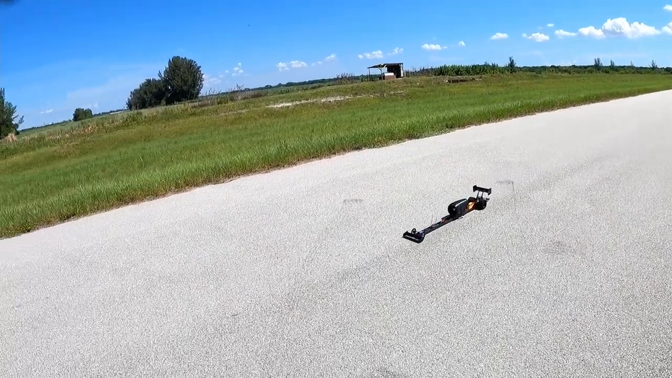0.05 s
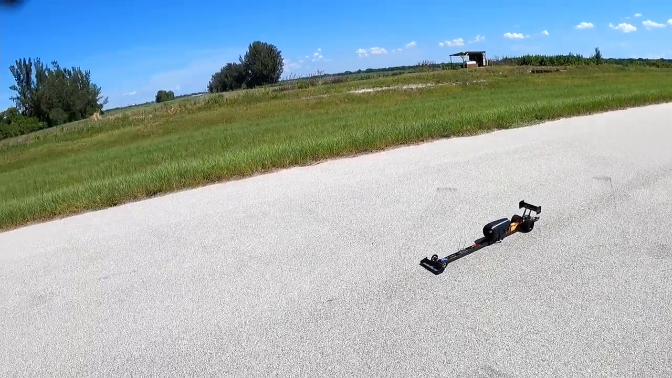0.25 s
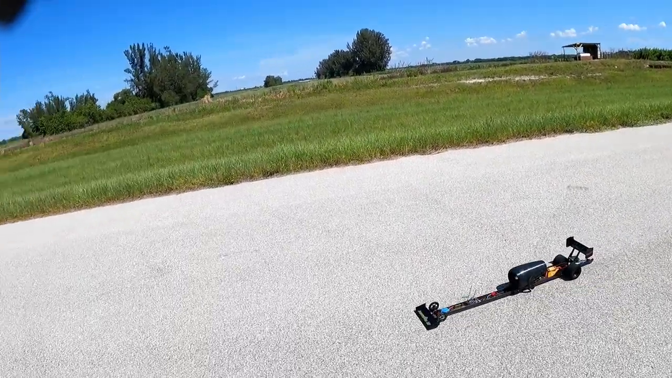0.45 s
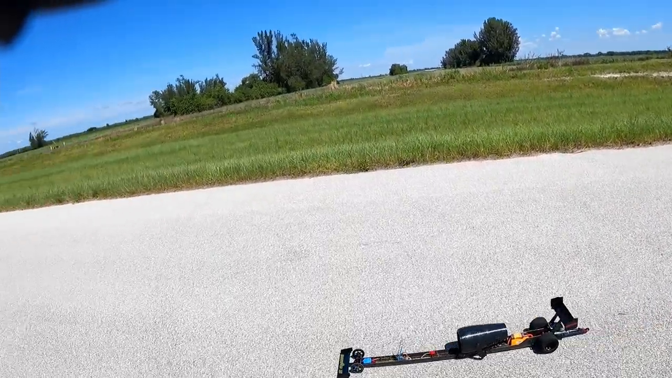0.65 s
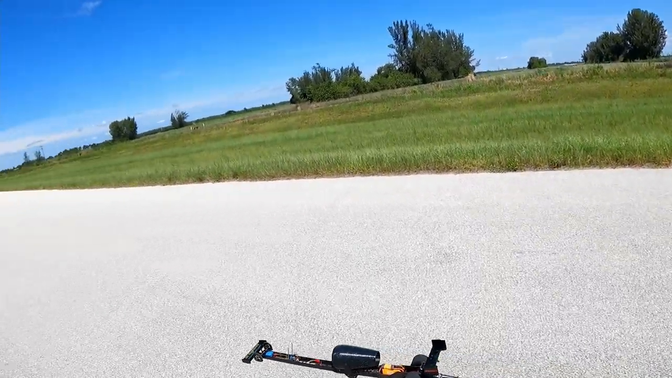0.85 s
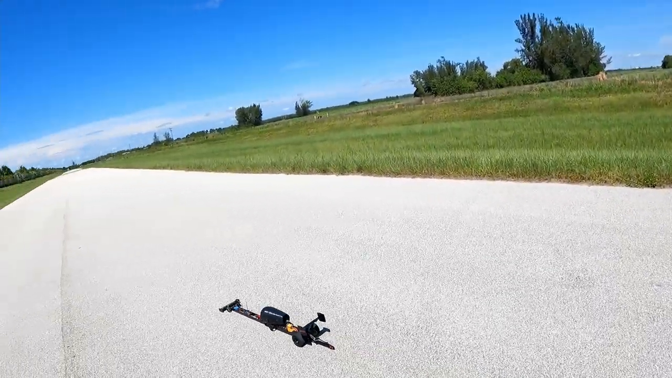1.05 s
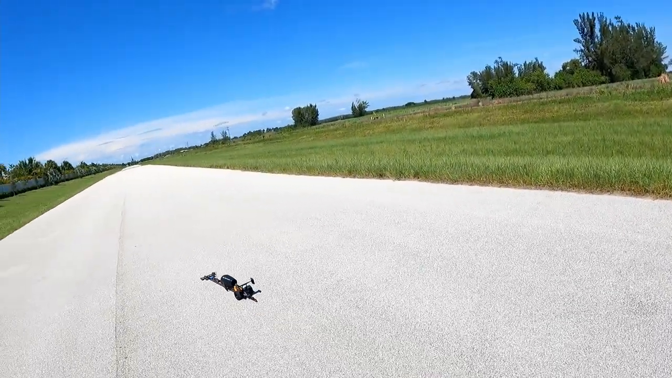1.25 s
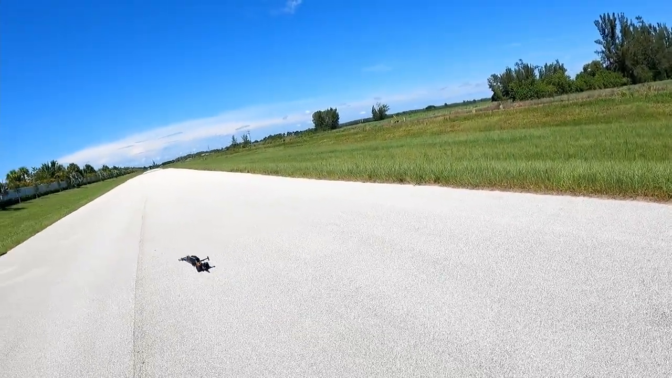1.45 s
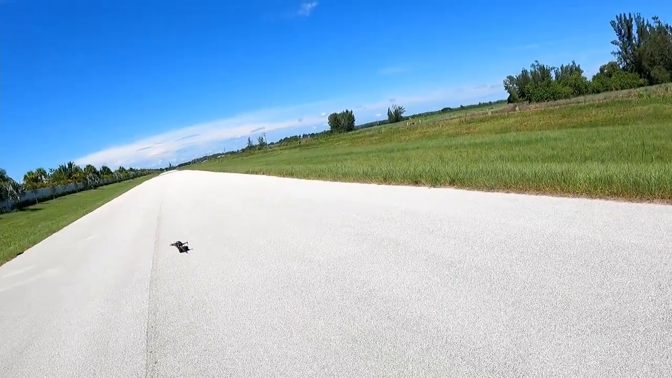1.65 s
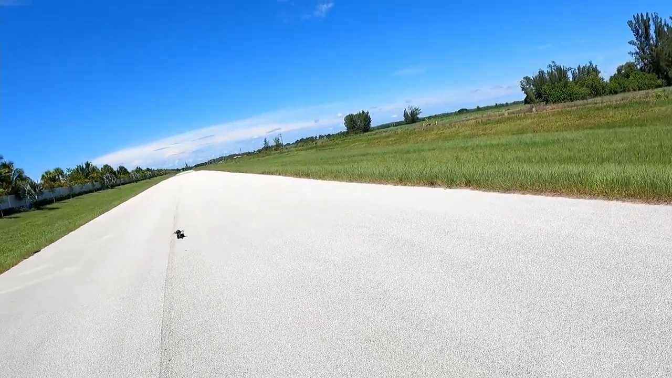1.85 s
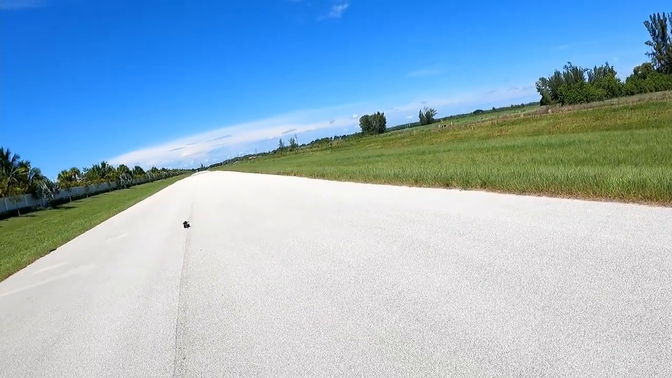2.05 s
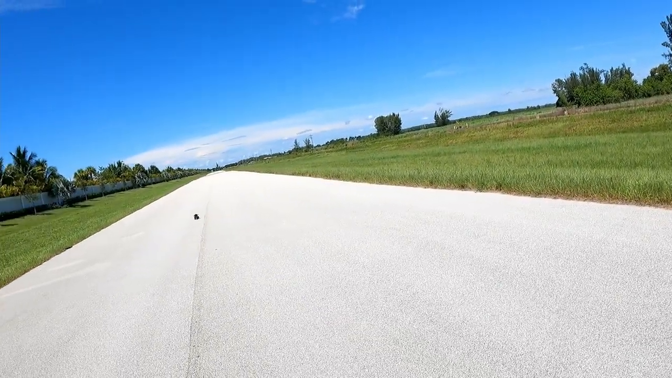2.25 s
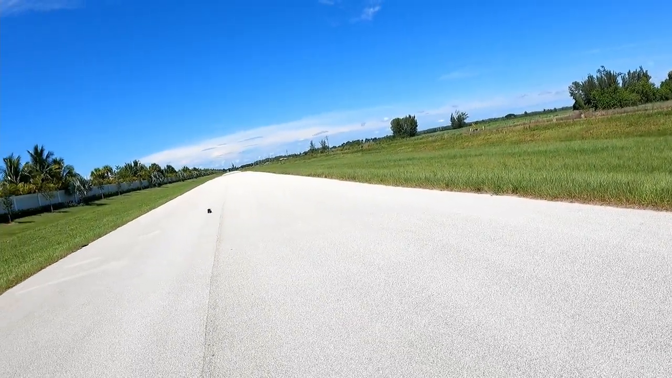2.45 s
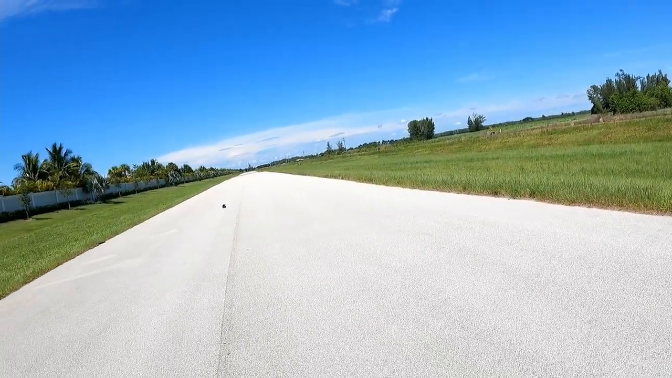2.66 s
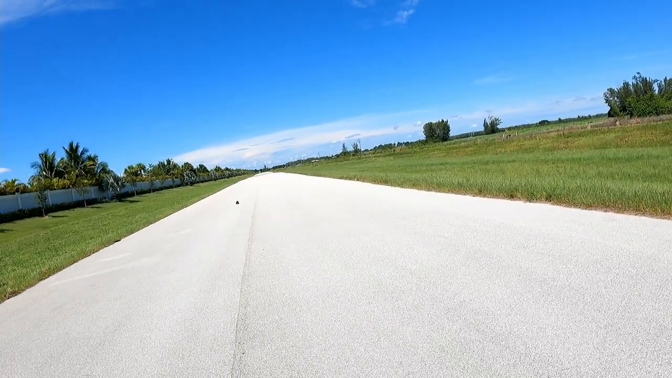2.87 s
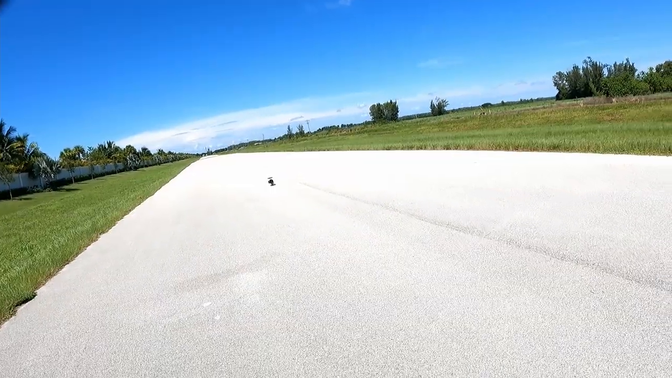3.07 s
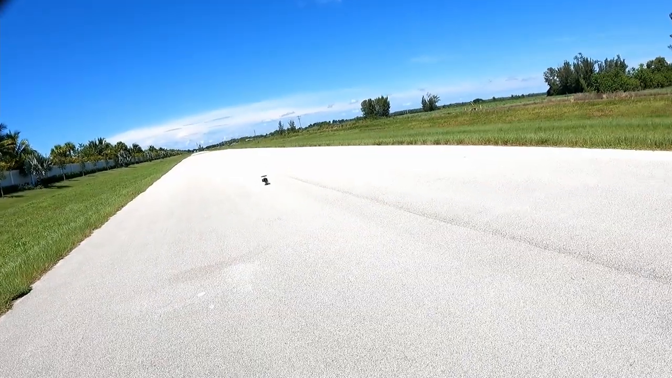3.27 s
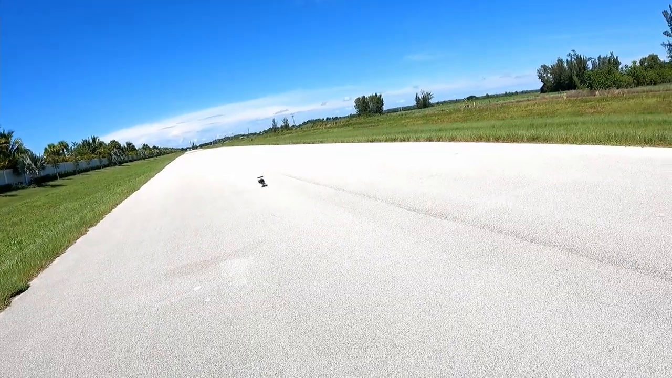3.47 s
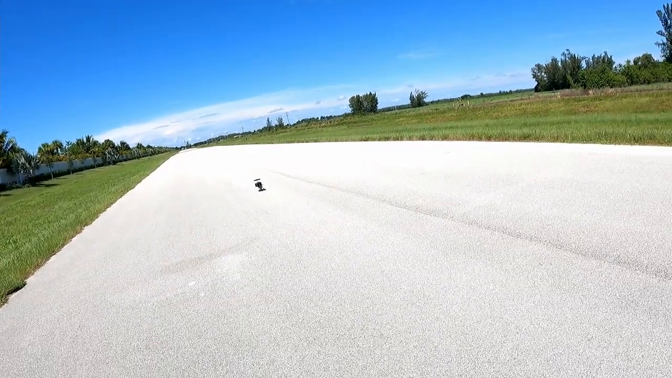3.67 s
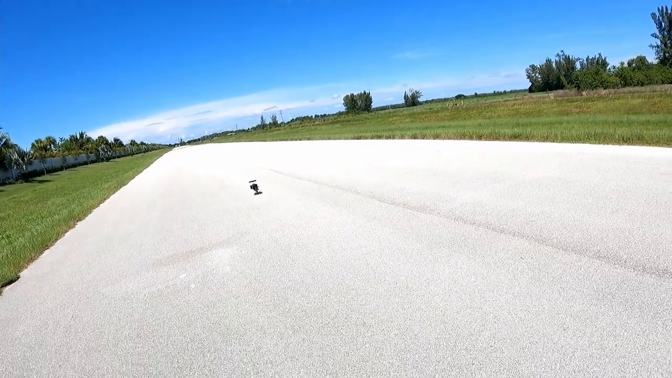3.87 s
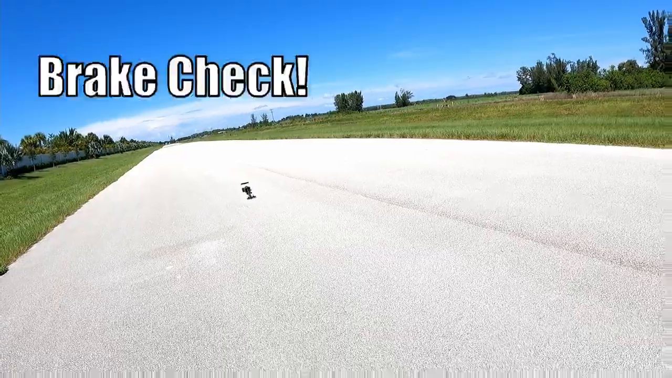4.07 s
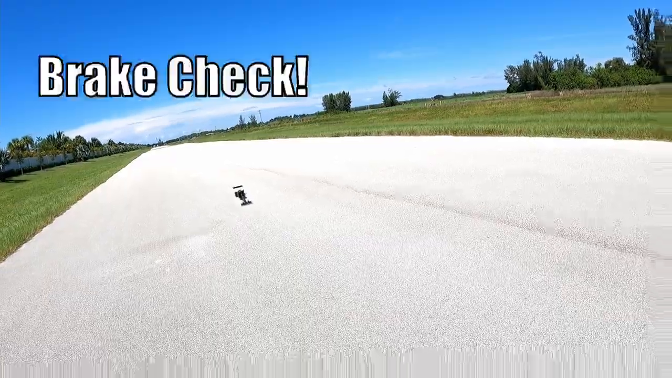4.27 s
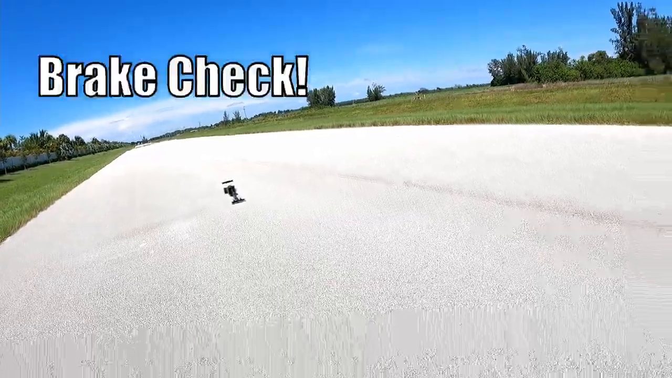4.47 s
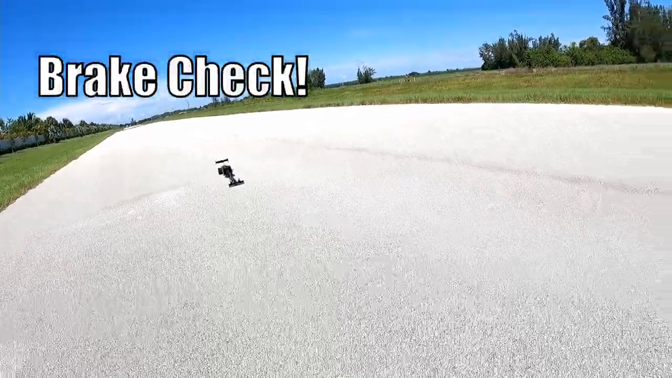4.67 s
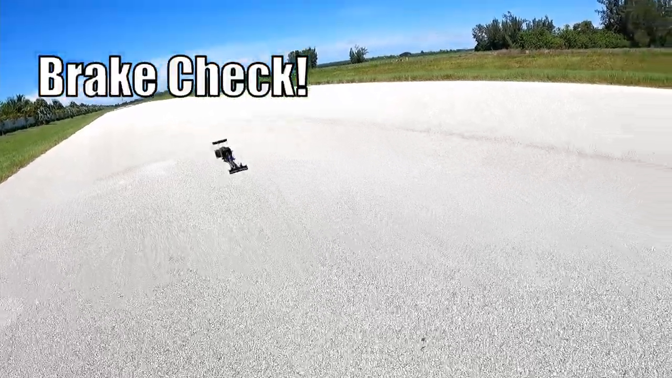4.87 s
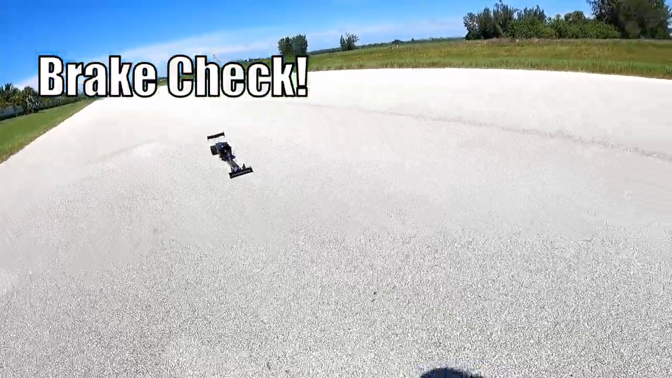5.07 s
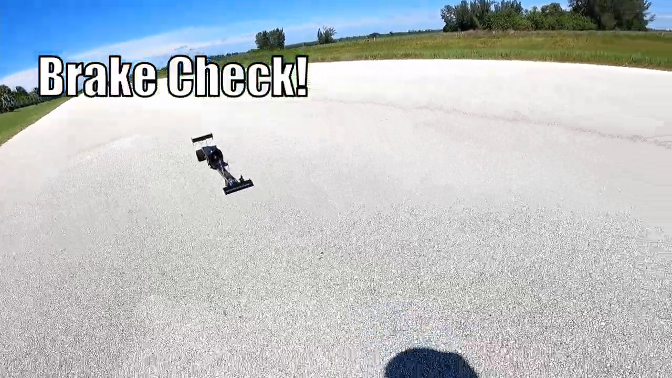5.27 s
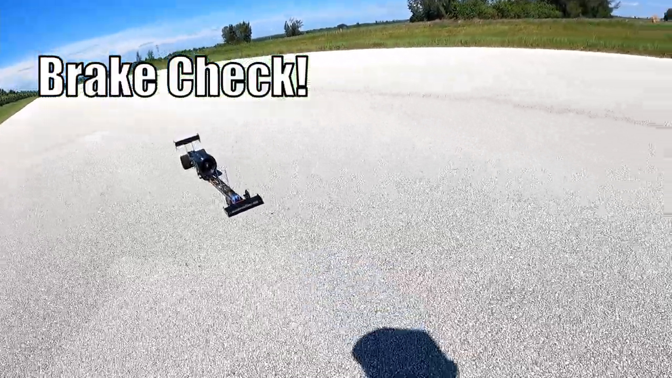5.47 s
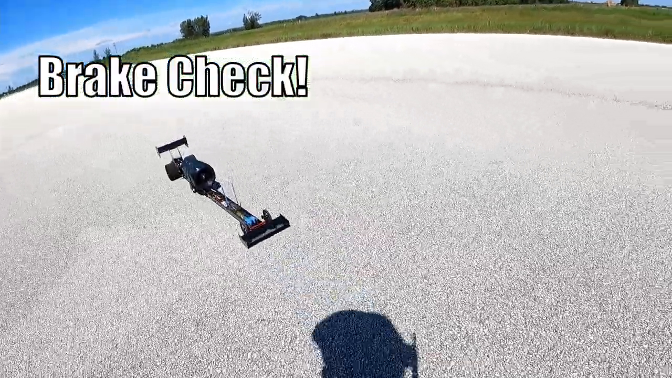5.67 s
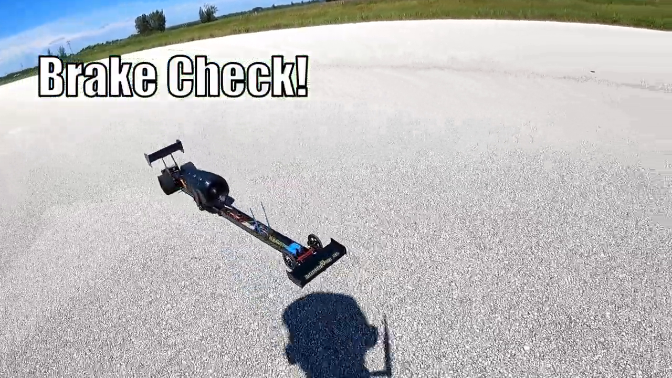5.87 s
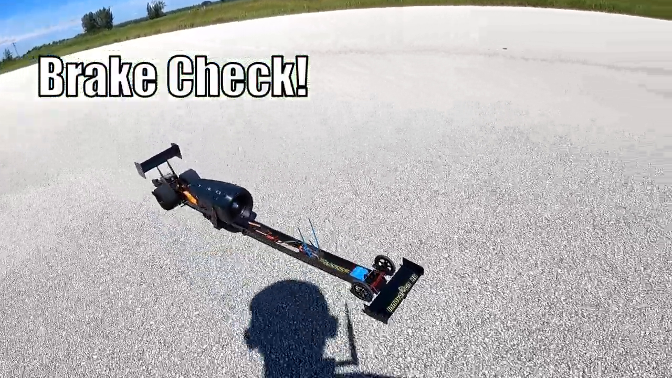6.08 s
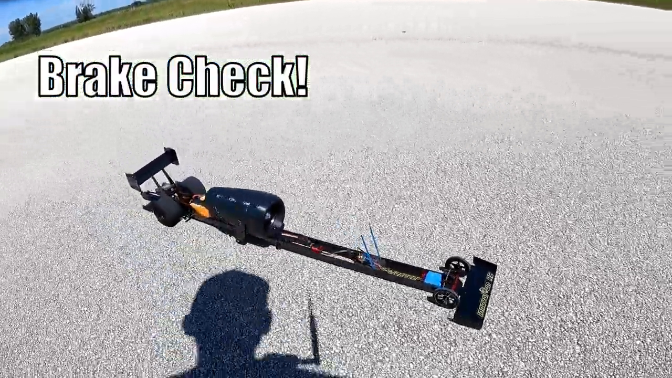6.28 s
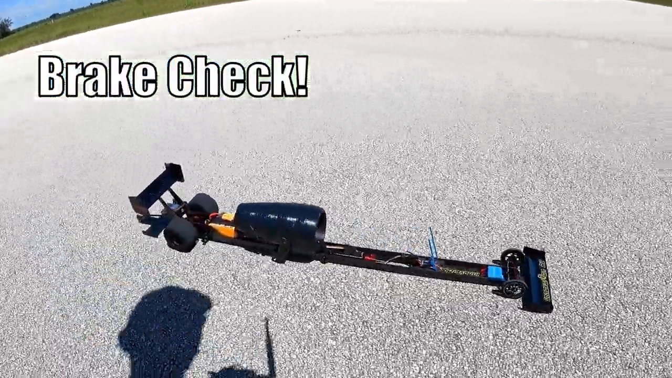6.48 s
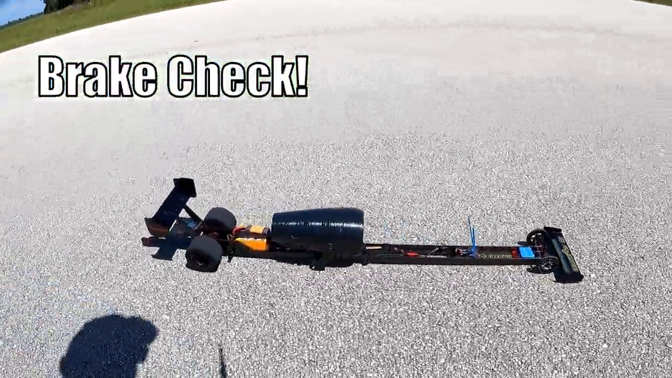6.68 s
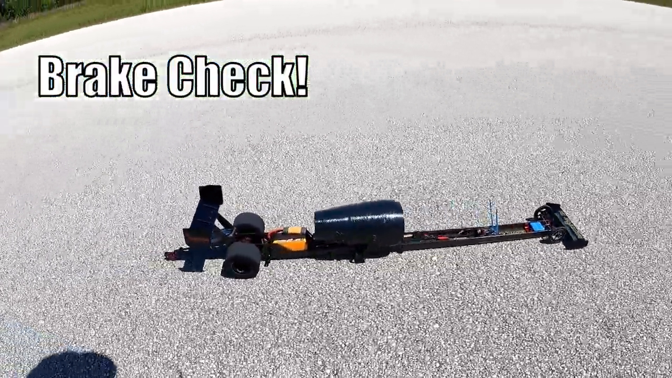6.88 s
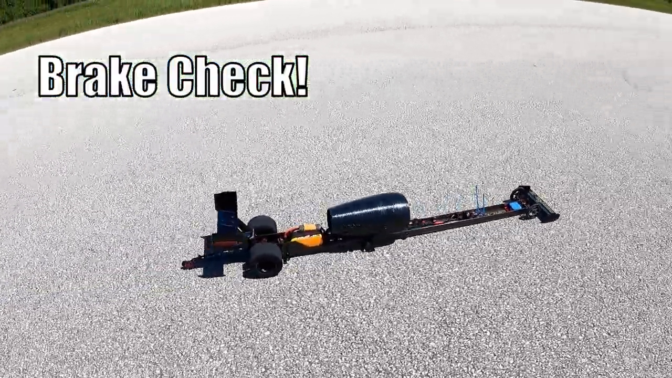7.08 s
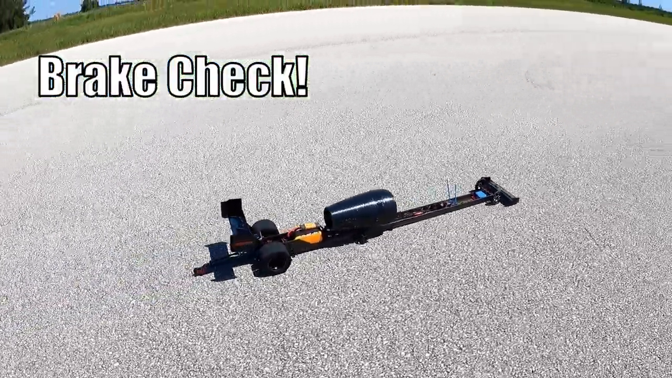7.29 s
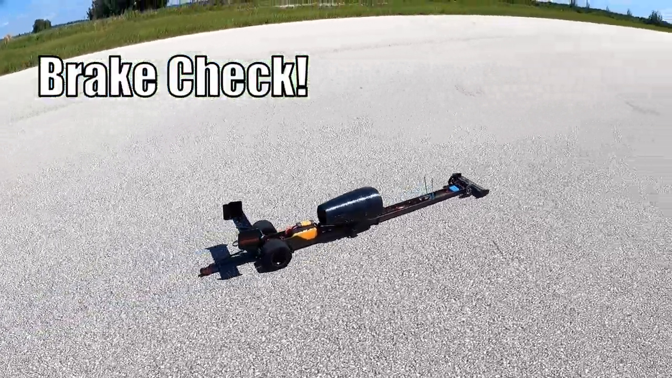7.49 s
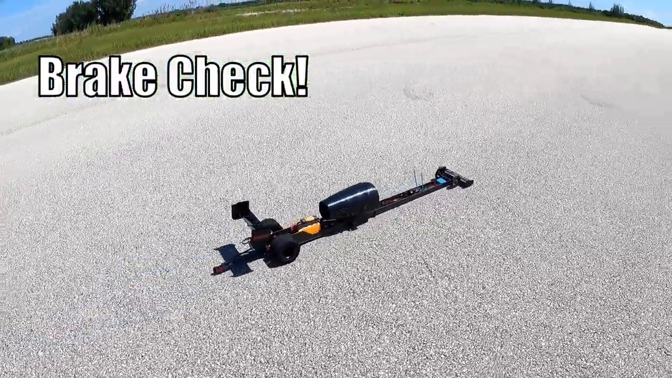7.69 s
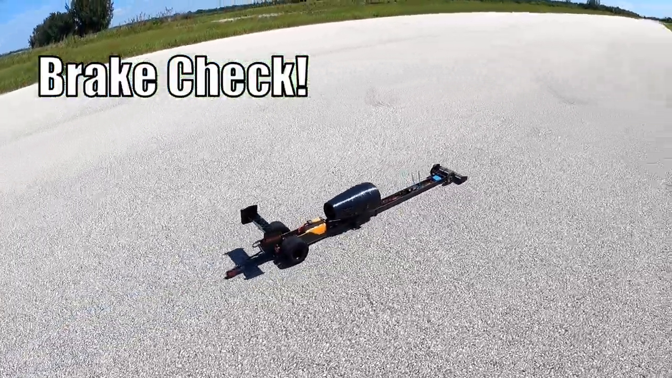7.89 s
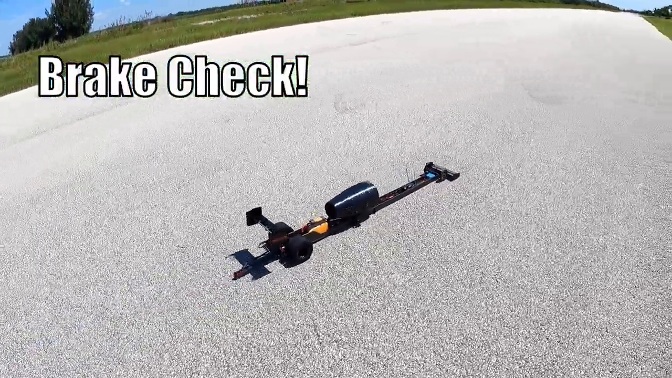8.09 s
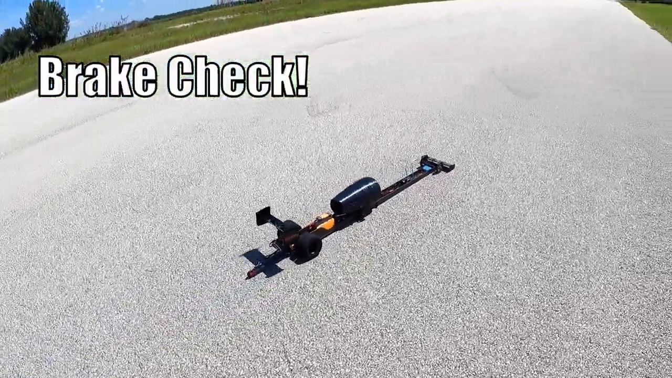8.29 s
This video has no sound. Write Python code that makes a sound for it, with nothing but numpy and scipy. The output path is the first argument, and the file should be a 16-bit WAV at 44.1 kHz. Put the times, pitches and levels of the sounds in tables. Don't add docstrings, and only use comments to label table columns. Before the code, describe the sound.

High ducted-fan whine over rushing air passes and shrinks away, drops out briefly, chirps back to life, and climbs again as the model car nears.

```python
import sys
import numpy as np
from scipy import signal
from scipy.io import wavfile
from scipy.ndimage import uniform_filter1d

SR = 44100
rng = np.random.default_rng(int(sys.argv[2]) if len(sys.argv) > 2 else 0)


def level_to_linear(level):
    exponent = np.asarray(level, float) / 20
    return 10 ** exponent


def put_to_file(sound):
    columns = np.atleast_2d(sound).T
    safe = np.clip(columns, -1, 1)
    whole_steps = np.round(safe * 32767)
    wavfile.write(sys.argv[1], SR, whole_steps.astype(np.int16))


N = 367794
T = np.arange(N) / SR

# (time [s], loss by distance and low throttle [dB], heading [-1 nose on, 0 side on, 1
PATH_AWAY = [(0.0, 5.3, 0.14), (0.4, 4.6, 0.15), (0.62, 7, -0.062), (0.85, 6.4, 0.96), (1.1, 5.6, 1),
             (1.55, 10.7, 0.45), (2.12, 22.7, 0.7), (2.5, 27.5, 1), (2.96, 28, 0.98)]
PATH_IDLE = [(2.961, 25.3, -0.22), (3.123, 16, -0.59), (3.173, 21.5, -0.057), (3.33, 21, -0.28)]
PATH_BACK = [(3.36, 18, -0.63), (3.54, 11.5, -0.86), (4.1, 15, -0.91), (4.7, 5, -1.2), (5.05, 5, -1.16),
             (5.35, 0.5, -0.94), (5.87, 0.5, -0.76), (6.201, 1.5, -0.31), (6.55, -0.5, 0.2), (7.0, 0.5, 1),
             (7.9, 1, 0.62), (8.34, 2.5, 0.67)]
PATH = PATH_AWAY + PATH_IDLE + PATH_BACK
AWAY_END_S, BACK_START_S, BACK_END_S = PATH_AWAY[-1][0], PATH_BACK[0][0], PATH_BACK[-1][0]

# (time [s], rate [Hz])
RATE_AWAY = [(0.0, 5385), (0.14, 5947), (0.35, 6452), (0.62, 6906), (0.8, 7022), (1.27, 7055), (2.23, 7039),
             (2.37, 6960), (2.96, 7043)]
RATE_BACK = [(3.46, 3127), (3.54, 3509), (3.64, 3627), (3.92, 3277), (4.41, 3561), (4.7, 4522),
             (4.87, 4417), (5.14, 5067), (5.36, 5325), (5.47, 5266), (5.74, 5529), (6.2, 5609), (6.5, 5373),
             (7.14, 5422), (7.27, 5569), (7.9, 5735), (8.07, 6418), (8.34, 6514)]
IDLE_HZ, IDLE_START_S, RESTART_S = 2350, 2.961, 3.36
ROTOR_INERTIA_S = 0.05
# (time [s], rate shift [Hz], half width [s])
HUNTING = [
    (6.62, -55, .08),
    (6.85, 55, .09),
    (7.03, -40, .07),
]

LEVEL_LAWS = {"tone": (9.7, 0.95, 0), "octave": (-2, 0.53, -5), "pipe": (17, 1.7, -3),
              "breath": (5.6, 0.92, 0.21), "hiss": (5.1, 1.06, 0), "jet": (8.5, 0.59, 6.64),
              "intake": (1.07, 0.5, 10.86), "fizz": (8.2, 1.16, 1.9)}
DIRECTIVITY = {"tone": (-22, -23, -24), "octave": (-41, -52.5, -49.5), "hiss": (-33.5, -31.5, -33),
               "jet": (-35.5, -33.5, -31), "intake": (-24, -45, -37.5), "fizz": (-35, -41, -43.5),
               "breath": (-33, -36, -28.5), "pipe": (-44, -35, -28.5)}
REFERENCE_HZ = 5500

# (time [s], level [dB], half width [s])
TONE_FADES = [(0.0, -1, .04), (.08, 3.5, .04), (.63, 8.5, 0.15), (.85, -3, 0.025), (.95, 4.5, 0.031),
              (1.06, -6, .04), (1.13, -8, 0.014), (3.58, -9, 0.11), (4.52, -3, .08), (4.72, 3, 0.036),
              (4.89, -5, 0.079), (4.99, 7, 0.05), (5.16, 4, .1), (5.42, -13, 0.21), (5.68, 5, 0.059),
              (6.15, 5.5, .1), (6.87, -1, 0.14), (7.33, -6.5, 0.095)]
# (time [s], level [dB], half width [s])
OCTAVE_LIFTS = [(.17, 19, 0.22), (2.7, -20, 0.56), (6.45, 10.5, 0.23)]
# (time [s], blade rate [Hz], tone [dB], octave [dB], not played)
COAST = [(2.962, 2462, -42, -63), (3.01, 2288, -39, -56), (3.026, 2250, -44, -63)]
SWITCH_HZ, MIRROR_REACH_HZ, MIRROR_DB = 6030, 260, 1

# (start [s], end [s], start pitch [Hz], end pitch [Hz], near level [dB])
WHISTLE = [(.3, .74, 6120, 6090, -31), (.75, 1.2, 6070, 6040, -26), (1.21, 2.96, 5985, 5910, -29),
           (3.372, 4.57, 6015, 6005, -30), (4.72, 4.9, 6000, 5990, -33), (6.77, 7.37, 6120, 6070, -33),
           (7.74, 8.4, 6045, 6020, -28)]
WHISTLE_LOSS_SHARE = 0.9
RESTART_WHISTLE_S, KICK_DB, KICK_DECAY_S = WHISTLE[3][0], 14, 0.13
# (start [s], end [s], start pitch [Hz], end pitch [Hz], level [dB])
GLIDES = [
    (0, 0.093, 8700, 9100, -39),
    (3.058, 3.236, 6400, 6000, -48),
    (3.085, 3.16, 5600, 5870, -55),
    (3.163, 3.22, 5860, 6330, -55),
]
STEP_START_S, STEP_S, STEP_RAMP_S, STEP_COUNT = 3.2225, 0.0135, 0.0028, 11
PERIOD_US, SHRINK_US, SHRINK_MORE_US = 333, 7.3, 0.83
# (centre [Hz], half width [Hz], level [dB])
CASING = [(3920, 120, -41), (5000, 70, -23), (6300, 240, -36), (7700, 200, -46)]
STEP_FLOOR_DB = -68

# (frequency [Hz], density [dB/Hz])
DUCT = [(1470, -42), (2500, -11), (2840, -7.5), (3360, -6.5), (3640, -11), (3920, -5), (4230, -11.5),
        (4660, -2), (5270, -1.5), (5500, -1.5), (6390, -5), (7660, -9), (9000, -21), (11700, -43),
        (19800, -120)]
JET = [(59, -44), (100, -14.5), (242, -4), (364, -7.5), (505, -3), (777, -2.5), (1280, -6), (1500, -5),
       (1950, -6.5), (3300, -120)]
TAILPIPE = [(120, -42), (250, -4), (450, -2), (600, -13), (800, 1), (980, 2), (1150, -50), (2000, -70)]
INTAKE = [(710, -22.5), (1200, -13), (1420, -13), (1820, -2.5), (1990, -3.5), (2200, -1.5), (2450, -9.5),
          (3100, -16.5), (4030, -15.5), (6820, -120)]
FIZZ = [(5000, -22), (8500, -2.5), (10100, -3), (12800, -7.5), (14000, -18), (14500, -37), (14800, -67)]
DUCT_SPLIT_HZ = 2830

# (frequency [Hz], left-right coherence [ratio])
COHERENCE = [(60, 0.89), (300, 0.98), (1000, 0.95), (2300, 0.79), (2700, 0.86), (3300, 1), (3900, 0.2),
             (4700, 0.88), (6000, 1), (11000, 0.93), (13000, 0.25)]
# (frequency [Hz], left over right [dB])
LEAN = [(60, 0.5), (600, -1), (1200, -3.5), (1700, 0.5), (2800, -7), (3400, -4), (4000, -7), (4700, -3.5),
        (6500, 2), (14400, -3.5)]
# (frequency [Hz], left lead [rad])
LEAD = [(100, -.03), (600, -.18), (1800, -.8), (2400, -1.6), (3000, -1.0), (3800, -1.3), (4250, -2.4),
        (4600, .7), (5200, .1), (6500, 0)]

# (frequency [Hz], density [dB/Hz])
BUFFET = [(10, -14), (25, 0), (45, 0), (70, -19), (200, -53), (1000, -110)]
RUMBLE = [(20, -48), (60, 8), (110, -6.5), (170, -2.5), (330, -43), (1000, -90)]
BUFFET_DB, RUMBLE_DB, RUMBLE_LOSS_SHARE = -60, -47, 0.16
# (time [s], level [dB], half width [s])
GUSTS = [(0.0, 19, .6), (2.8, 17, 0.47), (3.37, 15, .1), (3.88, 19.5, 0.28), (4.53, 16, 0.38),
         (5.5, 5, 0.74), (7.3, 20, .15)]
# (time [s], level [dB], half width [s])
HUM_SWELLS = [(.2, 18, 0.97), (2.55, 15.5, 0.67), (4.3, 6.5, 1)]
HUM_HZ, HUM_DB, HUM_END_S = 62.4, -57, 5.2
# (time [s], level [dB])
INSECT = [(2.98, -67), (3.318, -51), (3.35, -36), (3.378, -48), (3.67, -41), (4.6, -35.5)]
INSECT_HZ, INSECT_WIDTH_HZ, INSECT_THROB_HZ = 4980, 230, 65
# (frequency [Hz], density [dB/Hz])
AMBIENCE = [(120, -39), (200, -17), (342, -25), (586, -13), (3100, -22), (4140, -37), (6240, -11),
            (6950, -33), (14500, -51)]
AMBIENCE_DB = -57

# (time [s], level [dB], reference frequency [Hz], the noise band lying at 0.52 to 0.77 of it,
# length [s])
SCUFFS = [
    (3.035, -47, 1480, 0.008),
    (3.06, -46, 1620, 0.011),
    (3.08, -43, 2200, 0.008),
    (3.112, -39.5, 1930, 0.01),
    (4.953, -22, 1890, 0.0052),
]


def evened(x):
    return x / np.sqrt(np.mean(x ** 2) + 1e-20)


def read(points, hz):
    f, value = np.transpose(points)
    return np.interp(np.log(hz + 1), np.log(f + 1), value)


def curves(rows):
    s, *columns = np.transpose(rows)
    return [np.interp(T, s, column) for column in columns]


def swells(rows):
    return sum(height * np.exp(-((T - s) / width_s) ** 2) for s, height, width_s in rows)


def gate(start_s, end_s, edge_s=0.002):
    return np.clip(np.minimum(T - start_s, end_s - T) / edge_s + 0.5, 0, 1)


def drift(rate_hz):
    knots = rng.standard_normal(N // 64 + 2)
    b, a = signal.butter(2, min(rate_hz * 128 / SR, 0.9))
    smooth = evened(signal.lfilter(b, a, knots))
    return np.interp(np.arange(N) / 64, np.arange(len(knots)), smooth)


def noise(spectrum, patchy_db):
    hz = np.fft.rfftfreq(1024, 1 / SR)
    a, b, c, d, patches = rng.standard_normal((N // 256 + 5, 513, 5)).T
    patches = uniform_filter1d(patches, size=10, axis=0)
    patches = evened(uniform_filter1d(patches, size=12, axis=1))
    same = np.clip(read(COHERENCE, hz), -1, 1)[:, None]
    lead = np.exp(1j * read(LEAD, hz))[:, None]
    lean = level_to_linear(read(LEAN, hz) / 2)[:, None]
    right = a + 1j * b
    left = same * lead * right + np.sqrt(1 - same ** 2) * (c + 1j * d)
    colour = level_to_linear(read(spectrum, hz)[:, None] + patchy_db * patches)
    pair = np.array([left * lean, right / lean]) * colour
    out = signal.istft(pair, nperseg=1024, noverlap=768)[1][:, :N]
    return out / np.sqrt(np.mean(out.mean(0) ** 2))


def tone(hz, db, waver_hz, flutter_db):
    hz = hz + waver_hz * drift(58.0)
    phase = 2 * np.pi * (np.cumsum(hz) / SR + rng.random())
    lead, lean = read(LEAD, hz), level_to_linear(read(LEAN, hz) / 2)
    pair = np.array([lean * np.sin(phase + lead), np.sin(phase) / lean])
    flutter = drift(17.3) + 0.73 * drift(4.1)
    return np.sqrt(2) * level_to_linear(db + flutter_db * flutter) * pair


def blade_rate_hz():
    idle = [(IDLE_START_S, IDLE_HZ), (RESTART_S, IDLE_HZ)]
    hz = curves(list(RATE_AWAY) + idle + list(RATE_BACK))[0] + swells(HUNTING)
    passes = np.split(hz, [int(RATE_AWAY[-1][0] * SR)])
    size = int(ROTOR_INERTIA_S * SR)
    return np.concatenate([uniform_filter1d(part, size=size, mode="nearest") for part in passes])


def path_loss_db():
    return curves(PATH)[0]


def heard_db(layer):
    loss_db, heading = curves(PATH)
    per_octave_db, loss_share, road_db = LEVEL_LAWS[layer]
    facing_db = np.interp(heading, [-1, 0, 1], DIRECTIVITY[layer])
    rate_db = per_octave_db * np.log2(blade_rate_hz() / REFERENCE_HZ)
    full_speed = T < AWAY_END_S
    return facing_db + rate_db - loss_share * loss_db + road_db * full_speed


def blades():
    hz = blade_rate_hz()
    db = heard_db("tone") + swells(TONE_FADES)
    octave_db = heard_db("octave") + swells(OCTAVE_LIFTS)
    mirror_db = MIRROR_DB - 10 * ((hz - SWITCH_HZ) / MIRROR_REACH_HZ) ** 2
    out = tone(hz, db, waver_hz=8.4, flutter_db=2.0)
    out += tone(2 * hz, octave_db, waver_hz=14.2, flutter_db=4.5)
    out += tone(2 * SWITCH_HZ - hz, db + mirror_db - 5, waver_hz=8.5, flutter_db=1.5)
    out += tone(4 * SWITCH_HZ - 2 * hz, octave_db + mirror_db - 8, waver_hz=12, flutter_db=5.0)
    out *= gate(-1, RATE_AWAY[-1][0]) + gate(BACK_START_S, BACK_END_S)
    coast_hz, coast_db, _ = curves(COAST)
    coast = tone(coast_hz, coast_db, waver_hz=8, flutter_db=0)
    return out + coast * gate(COAST[0][0], COAST[-1][0])


def air():
    gust_db = 0.38 * drift(6.1)
    duct = noise(DUCT, patchy_db=1.0)
    low_pass = signal.butter(4, DUCT_SPLIT_HZ, fs=SR, output="sos")
    breath = signal.sosfiltfilt(low_pass, duct)
    out = level_to_linear(heard_db("hiss") + gust_db + 10.5) * (duct - breath)
    out += level_to_linear(heard_db("breath") + gust_db + 11) * breath
    out += level_to_linear(heard_db("jet") + gust_db + 1.5) * noise(JET, patchy_db=0.95)
    out += level_to_linear(heard_db("pipe") + gust_db) * noise(TAILPIPE, patchy_db=0.5)
    out += level_to_linear(heard_db("intake") + gust_db + 2 + 0.37 * drift(130)) * noise(INTAKE, patchy_db=0.64)
    out += level_to_linear(heard_db("fizz") + gust_db + 4 + 0.66 * drift(30)) * noise(FIZZ, patchy_db=0.5)
    return out


def field():
    buffet_db = BUFFET_DB + swells(GUSTS) + 2.5 * drift(6.6)
    rumble_db = RUMBLE_DB - RUMBLE_LOSS_SHARE * path_loss_db()
    out = level_to_linear(buffet_db) * noise(BUFFET, patchy_db=4.5)
    out += level_to_linear(rumble_db) * noise(RUMBLE, patchy_db=1.5)
    hum = tone(HUM_HZ, HUM_DB + swells(HUM_SWELLS), waver_hz=0.27, flutter_db=2.3)
    out += hum * gate(-1, HUM_END_S, edge_s=0.4)
    throb = level_to_linear(curves(INSECT)[0] - 3 + 2.5 * np.sin(2 * np.pi * INSECT_THROB_HZ * T))
    insect = throb * tone(INSECT_HZ, 0, waver_hz=INSECT_WIDTH_HZ, flutter_db=1.5)
    out += insect * gate(INSECT[0][0], INSECT[-1][0], edge_s=0.05)
    return out + level_to_linear(AMBIENCE_DB) * noise(AMBIENCE, patchy_db=0.7)


def glides():
    out = np.zeros((2, N))
    for start_s, end_s, from_hz, to_hz, db in GLIDES:
        hz = np.interp(T, [start_s, end_s], [from_hz, to_hz])
        out += tone(hz, db, waver_hz=7, flutter_db=3.0) * gate(start_s, end_s, edge_s=0.008)
    return out


def whistle():
    corners = []
    level = np.zeros(N)
    for start_s, end_s, from_hz, to_hz, db in WHISTLE:
        corners += [(start_s, from_hz), (end_s, to_hz)]
        level += level_to_linear(db) * gate(start_s, end_s, edge_s=0.01)
    since_s = T - RESTART_WHISTLE_S
    kick_db = KICK_DB * np.exp(-abs(since_s) / KICK_DECAY_S) * (since_s > -0.01)
    db = kick_db - WHISTLE_LOSS_SHARE * path_loss_db()
    return level * tone(curves(corners)[0], db, waver_hz=12.3, flutter_db=0.5)


def scuffs():
    out = np.zeros((2, N))
    s = np.arange(2000) / SR
    for start_s, db, hz, length_s in SCUFFS:
        b, a = signal.butter(1, [0.52 * hz, 0.77 * hz], "band", fs=SR)
        grit = signal.lfilter(b, a, rng.standard_normal((2, 2000)))
        shape = np.exp(-2 * ((s - length_s) / length_s) ** 2)
        burst = level_to_linear(db) * evened(grit + 0.66 * grit[::-1]) * shape
        out[:, round(start_s * SR):][:, :2000] += burst
    return out


def restart_steps():
    place = np.clip((T - STEP_START_S) / STEP_S, 0, STEP_COUNT)
    step = np.floor(place)
    hz = 1e6 / (PERIOD_US - SHRINK_US * step - SHRINK_MORE_US * step ** 2)
    to_edge_s = np.minimum(place - step, 1 + step - place) * STEP_S
    shape = np.clip(to_edge_s / STEP_RAMP_S, 0, 1)
    out = np.zeros((2, N))
    for f in (hz, 2 * hz):
        lift = level_to_linear(STEP_FLOOR_DB)
        for centre_hz, width_hz, db in CASING:
            lift = lift + level_to_linear(db) / (1 + ((f - centre_hz) / width_hz) ** 2)
        out += tone(f, 0, waver_hz=7.3, flutter_db=2.5) * lift * shape
    return out


def scene():
    controller = glides() + whistle() + restart_steps()
    return blades() + air() + field() + controller + scuffs()


def roll_off(x):
    return signal.sosfilt(signal.butter(12, 15000, fs=SR, output="sos"), x)


def record(dry):
    return roll_off(dry)


dry = scene()
out = record(dry)
put_to_file(out)
```